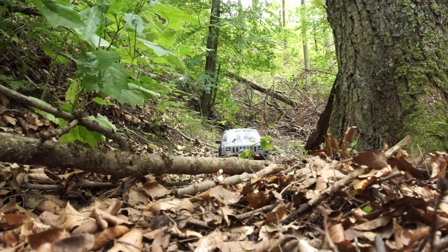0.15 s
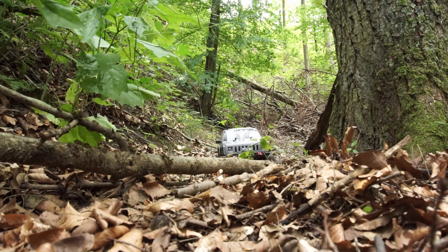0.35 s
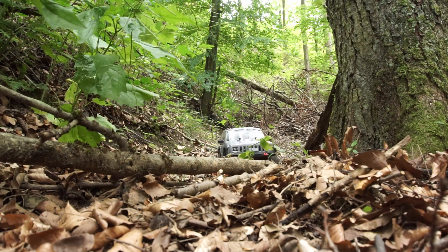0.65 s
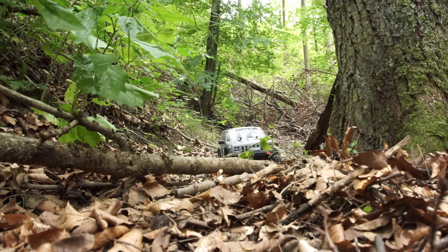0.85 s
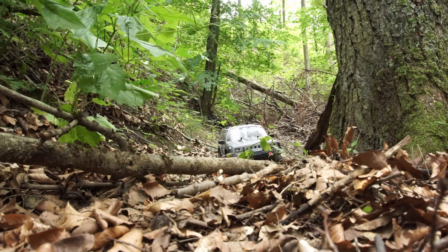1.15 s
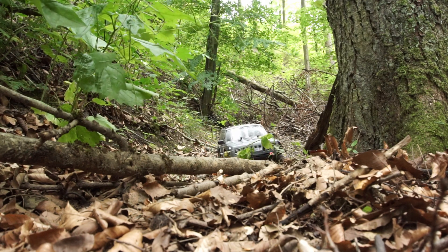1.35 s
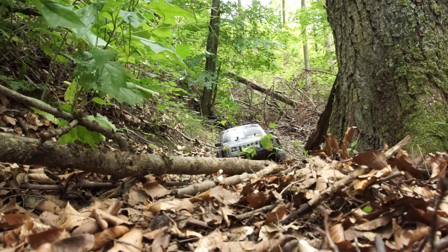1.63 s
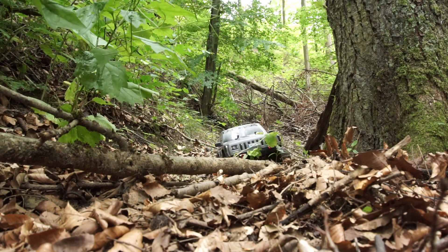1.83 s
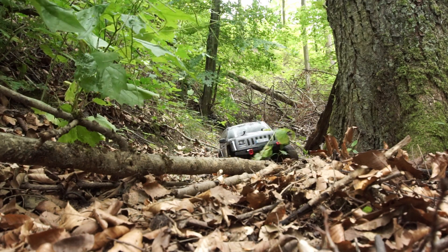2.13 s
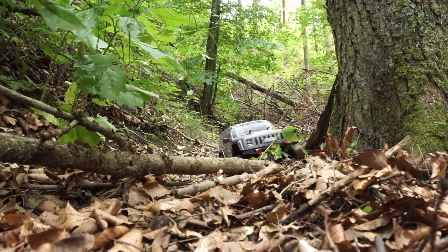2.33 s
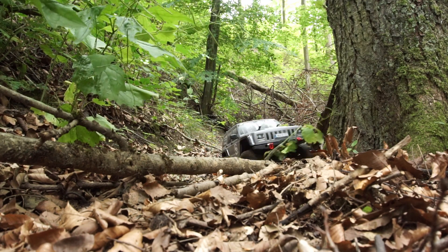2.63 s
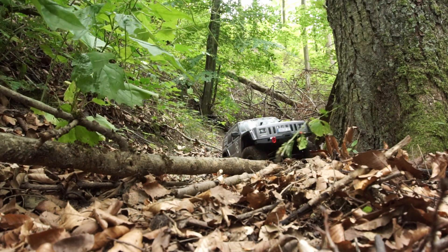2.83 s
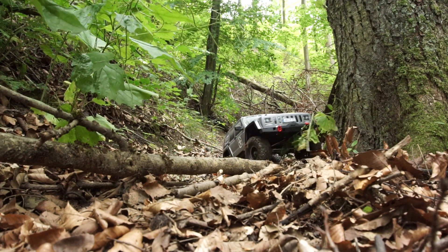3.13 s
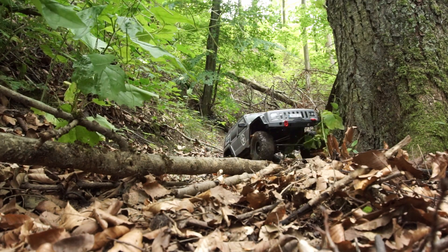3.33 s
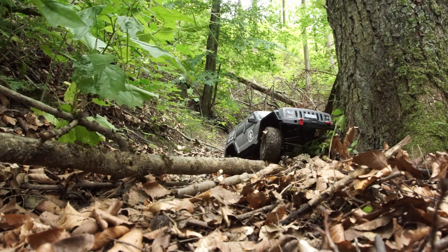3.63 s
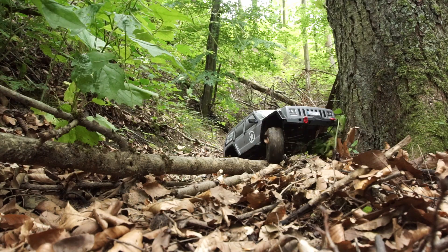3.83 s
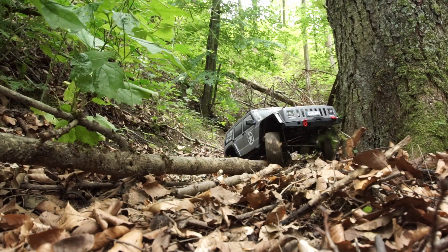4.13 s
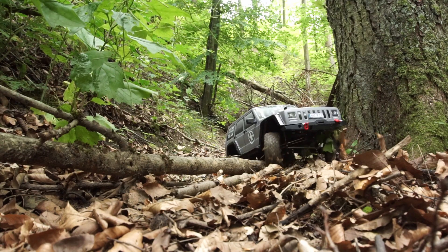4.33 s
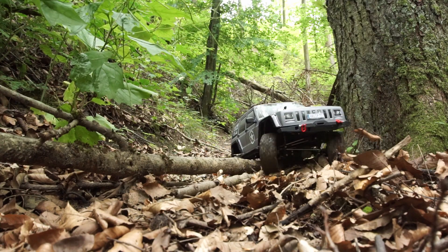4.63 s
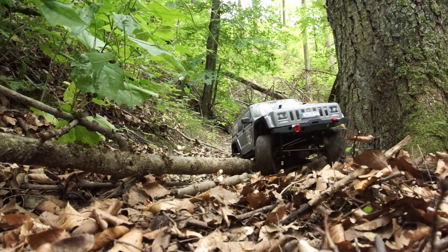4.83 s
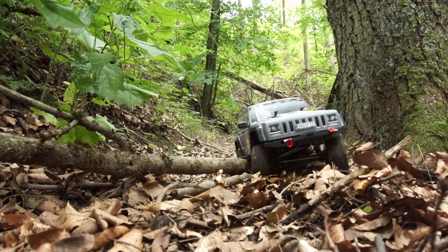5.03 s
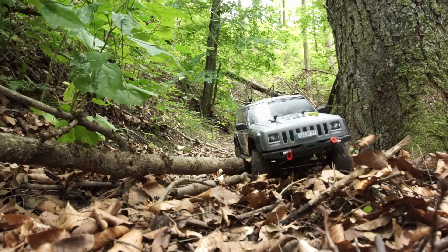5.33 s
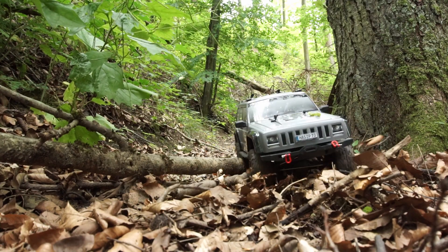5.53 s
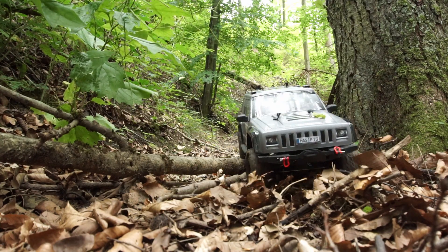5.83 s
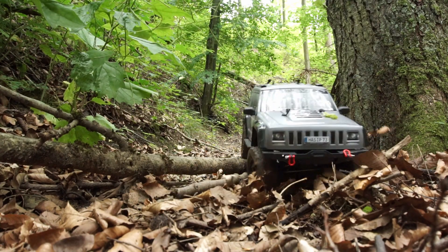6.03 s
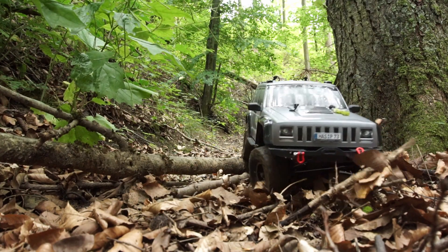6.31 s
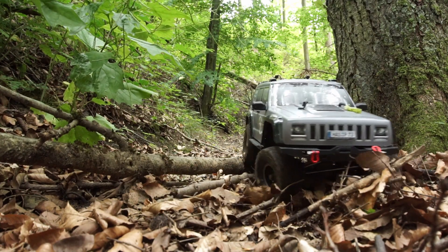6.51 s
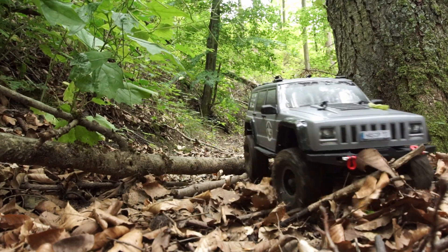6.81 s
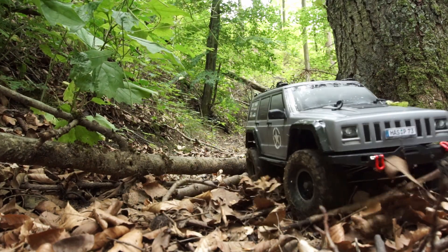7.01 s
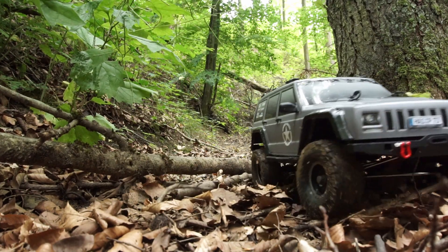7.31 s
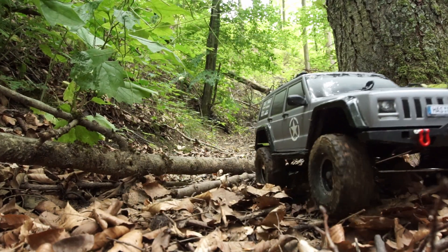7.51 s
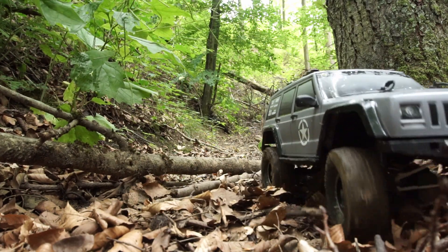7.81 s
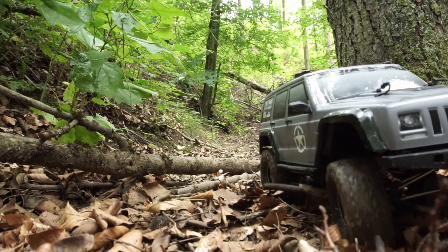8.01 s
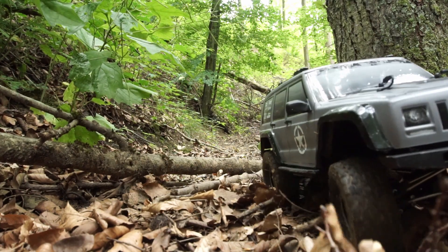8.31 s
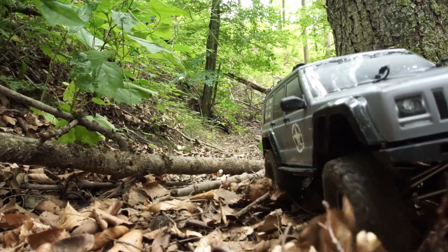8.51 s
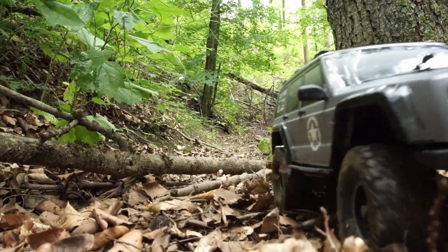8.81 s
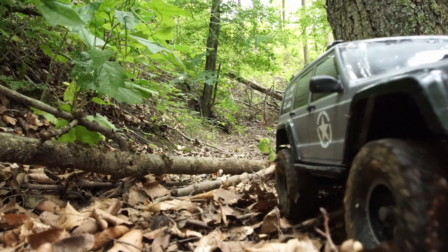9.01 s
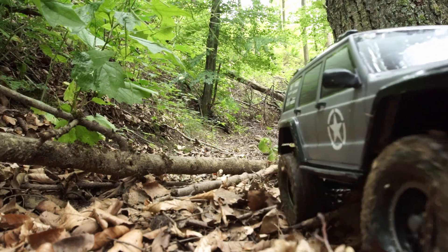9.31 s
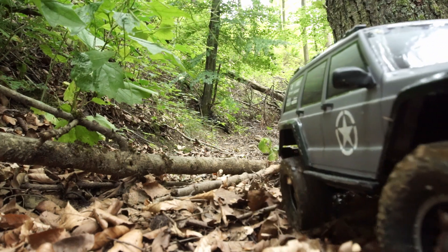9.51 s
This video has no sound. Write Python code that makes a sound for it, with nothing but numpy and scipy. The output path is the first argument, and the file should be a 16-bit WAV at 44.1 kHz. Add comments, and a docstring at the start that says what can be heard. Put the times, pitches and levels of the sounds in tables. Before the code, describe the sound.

Close stereo view from the leaf litter: sparse crackles and short high bird notes come first, over a low pulsating far-off engine. The toy truck bumps over roots with hollow knocks, then from about four seconds its tyres crunch bright, crisp leaves in uneven surges. Gear whirr and motor growl come and go underneath, with hard twig snaps and clacking sticks towards the end.

```python
"""A deep, throbbing drone of far machinery, slowly sinking in pitch, over a wavering forest background.
Close to the microphone a small radio-controlled crawler creeps through dry leaves, from left to right.
Tyres crush leaves in short noise bursts and snap twigs in sharp ones; root knocks ring dully and low.
Motor, gears and plastic shell are rough, juddering resonances; the drone is a sum of sines.
A far bird whistles in short wavering tones, blurred by echo from the trees."""
import sys
import numpy as np
from scipy import signal
from scipy.fft import rfft, irfft
from scipy.io import wavfile
from scipy.ndimage import uniform_filter1d

SR = 44100
rng = np.random.default_rng(int(sys.argv[2]) if len(sys.argv) > 2 else 0)


def waveform_to_disk(signal):
    """Save audio, clipped to [-1, 1], as 16-bit WAV at the path in sys.argv[1]."""
    frames = np.transpose(np.atleast_2d(signal))
    scaled = np.clip(frames, -1, 1) * 32767
    samples = np.round(scaled).astype(np.int16)
    wavfile.write(sys.argv[1], SR, samples)


N = 426006
TIME = np.arange(N) / SR
LEFT_RIGHT = np.array([[-1], [1]])

# the crawler's path past the microphone: t/s, distance/m, left minus right level/dB
PATH = [(0, 2, 2), (3, 0.79, 2.5), (4.2, 1.03, -1.5), (5.7, 0.8, 0), (7, 0.81, -1.5), (7.7, 0.62, -1.5),
        (9.66, 0.8, -2)]


def from_db(db):
    """Decibels to gain."""
    return 10 ** (np.asarray(db) / 20)


def rms_one(x):
    """Scale to unit rms."""
    return x / np.sqrt(np.mean(x ** 2) + 1e-20)


def in_time(rows):
    """One curve per column after the time, joined by straight lines."""
    s, *columns = np.transpose(rows)
    return [np.interp(TIME, s, c) for c in columns]


def at_hz(points, hz):
    """Read a spectrum on a log-frequency axis."""
    f, value = np.transpose(points)
    return np.interp(np.log(hz), np.log(f), value)


def drift(rate):
    """Slow chance with spread 1: noise through two equal poles at rate Hz, drawn every 40 samples."""
    r = np.exp(-80 * np.pi * rate / SR)
    noise = rng.standard_normal(N // 40 + 2002)
    slow = signal.lfilter([1], [1, -2 * r, r * r], noise)[2000:]  # skip the run-in
    return np.interp(np.arange(N) / 40, np.arange(len(slow)), rms_one(slow))


def band(x, low_hz, high_hz, order=2):
    """Causal band-pass."""
    edges = [low_hz, min(high_hz, .45 * SR)]
    return signal.sosfilt(signal.butter(order, edges, "band", fs=SR, output="sos"), x)


def add(out, s, sound):
    """Mix a sound in at time s."""
    start = max(round(s * SR), 0)
    out[..., start:start + sound.shape[-1]] += sound[..., :max(N - start, 0)]


def turning(hz):
    """Phase of something that turns hz times a second."""
    return 2 * np.pi * np.cumsum(hz) / SR


def engine(hum_db=-0.8, throb_db=0.0, waver_db=1.55, wander=0.21):
    """A steady deep note, and an engine's orders that beat at the cycle rate; the air makes them waver."""
    # the deep note: t/s, f/Hz
    hum_pitch = [(0, 72.7), (1.5, 71.05), (2.2, 72.2), (4.2, 70.1), (5.8, 70), (7.4, 68.8)]
    # before hum_db and throb_db: t/s, deep note level/dB, throb level/dB
    engine_level = [(0, -29.5, -30.5), (0.4, -28, -32), (0.9, -28, -27.5), (3.35, -29, -27),
                    (4.35, -30, -34), (4.75, -31.5, -40.5), (5.05, -29.5, -35), (6.9, -30, -29.5),
                    (7.28, -34, -37), (7.5, -29.5, -39), (8.0, -33.5, -56), (8.65, -37.5, -42),
                    (8.9, -42, -71)]
    # the image widens and shifts: t/s, right ear's lead in the deep note/rad, in the throb/rad
    engine_lead = [(1.38, .05, 0.32), (1.6, 2.1, 0.49), (1.9, 1.9, 2.16), (3.25, 2.2, 0.97),
                   (3.42, 0.87, 0.77), (4.4, 0.95, 1.3), (4.75, 1.1, 2.8), (5.02, 0.87, 1.3)]
    # the throbbing engine's speed: t/s, working cycles/Hz
    engine_speed = [(0, 15.0), (0.5, 14.36), (2.6, 14.3), (4.4, 14.06), (5.2, 14.31), (6.4, 14.1)]
    # parts of the throb: multiple of the cycle rate, relative level/dB
    engine_orders = [(7, -36.5), (8, -34), (9, -16), (10, -2.5), (11, -1), (13, -17.5), (14, -17.5)]
    deep_db, beat_db = in_time(engine_level)
    hum_lead, throb_lead = in_time(engine_lead)
    ears = LEFT_RIGHT / 2
    cycle = turning(in_time(engine_speed)[0])
    hum_phase = turning(in_time(hum_pitch)[0])
    hum = from_db(deep_db + hum_db) * np.sin(hum_phase + hum_lead * ears)
    sway = wander * drift(24)  # radians, shared by all orders
    throb = 0
    for multiple, db in engine_orders:
        phase = round(multiple) * cycle + rng.uniform(0, 2 * np.pi) + sway
        throb = throb + from_db(db + waver_db * drift(5.4)) * np.sin(phase + throb_lead * ears)
    return np.sqrt(2) * (hum + from_db(beat_db + throb_db) * throb)


def coloured(spectrum, envelope):
    """Stereo noise in bands of about half an octave, each under a fresh draw of envelope(); rms 1."""
    # how alike the two ears are: f/Hz, left-right correlation
    likeness = [(50, 0.89), (130, 0.99), (290, 0.95), (640, 0.015)]
    out, edges = 0, np.geomspace(22, 17500, 23)
    white = rng.standard_normal((2, 2, N))
    for k, (low, high) in enumerate(zip(edges, edges[1:])):
        hz = np.sqrt(low * high)
        if spectrum[0][0] <= hz <= spectrum[-1][0]:
            mid, side = band(white[k % 2], low, high)
            alike = np.clip(at_hz(likeness, hz), -1, 1)
            pair = np.sqrt(1 + alike) * mid - np.sqrt(1 - alike) * side * LEFT_RIGHT
            out = out + from_db(at_hz(spectrum, hz)) * envelope() * pair
    return rms_one(out)


def forest_air():
    """The forest's background: noise, mostly low, whose bands waver independently."""
    # the background sinks unevenly: t/s, level/dB
    forest_level = [(0, -37), (3, -35.5), (4.5, -41.5), (7.2, -38), (9, -43.5)]
    # its colour: f/Hz, relative level/dB per Hz
    forest_spectrum = [(25, -55), (48, 3.5), (90, 3), (160, 1.5), (250, -31), (450, -10.5), (900, -12),
                       (3000, -13.5), (6000, -16.5), (15000, -19.5)]
    noise = coloured(forest_spectrum, lambda: from_db(1.8 * drift(14)))
    return from_db(in_time(forest_level)[0]) * noise


def ripple(count, size, width):
    """Rows of random curves with spread 1, straight between knots width points apart."""
    knots = rng.standard_normal((count, size + 2))
    position = np.arange(size) / max(width, 1)
    i, part = position.astype(int), position % 1
    return rms_one(knots[:, i] * (1 - part) + knots[:, i + 1] * part)


def crumpling(spectrum, per_s, size_db, decay_s, rise_s, uneven_hz, uneven_db, flutter_db, size=1280):
    """Leaf after leaf buckles in a short stuttering burst, each of a different random colour."""
    count = int(per_s * N / SR)
    hz, t = np.arange(1, size // 2 + 2) * SR / size, TIME[:size]
    fine_db = uneven_db * np.tanh(ripple(count, len(hz), uneven_hz / hz[0]))
    broad_db = 2 * ripple(count, len(hz), 2500 / hz[0])
    colour_db = at_hz(spectrum, hz) + fine_db + broad_db
    noise = irfft(rfft(rng.standard_normal((2, count, size))) * from_db(colour_db))
    stutter = from_db(flutter_db * ripple(count, size, 29.0))
    strength = from_db(size_db * np.minimum(rng.exponential(1, (count, 1)), 4))
    shape = (1 - np.exp(-t / rise_s)) * np.exp(-t / decay_s) * (1 - t / t[-1])
    bursts = noise * stutter * strength * shape
    out = np.zeros((2, N))
    times = (np.arange(count) + 2 * rng.random(count)) / per_s
    for k, s in enumerate(times):
        add(out, s, bursts[:, k])
    power = np.mean(out ** 2, axis=0)
    # even out the chance clumping of the bursts
    return out / np.sqrt(uniform_filter1d(power, SR // 12) + 0.17 * power.mean())


def bite(hold_s, rise_s=0.008, fall_s=0.014):
    """Attack, hold and dying release of a tyre pressing into leaves."""
    t = TIME[:SR // 2]
    return np.minimum(t / rise_s, 1) * np.exp(-np.maximum(t - hold_s, 0) / fall_s)


def leaves(crackle_db=-1.52, crunch_right_db=3.0, surge_db=1.0):
    """Thin leaf edges crackle brightly; whole leaves crunch lower; both surge as the tread bites."""
    # steady crackle of tyres rolling on the litter, before crackle_db: t/s, level/dB
    rolling = [(0, -37), (1.1, -43), (1.4, -39), (2.6, -38), (3.25, -42), (4.1, -27), (4.8, -30),
               (5.1, -26.5), (5.7, -32.5), (6.55, -25.5), (7.0, -25.5), (7.55, -29), (7.85, -24),
               (8.75, -26), (9.05, -30.5), (9.66, -27)]
    # a tyre bites into a heap of leaves: t/s, hold/s, crackle level/dB, crunch level/dB
    bites = [(1.48, 0.23, -39.5, -43), (2.16, 0.02, -51, -32), (2.323, 0.074, -36, -39),
             (3.34, 0.068, -51, -30), (3.409, 0.057, -54, -39), (3.493, 0.193, -35, -42),
             (3.886, 0.15, -27.5, -31.5), (4.108, 0.064, -32, -35.5), (4.542, 0.12, -30, -30.5),
             (4.913, .16, -28, -30.5), (6.357, 0.046, -25.5, -43), (6.96, 0.1, -25.5, -49),
             (7.197, 0.019, -25, -32), (7.755, 0.14, -26.5, -27.5), (7.901, 0.056, -27, -38),
             (8.133, 0.121, -25, -37.5), (8.62, 0.063, -28, -33.5), (8.763, 0.053, -28, -29.5),
             (8.871, 0.066, -33, -35), (9.098, 0.025, -26, -37), (9.22, 0.036, -30, -37),
             (9.48, 0.16, -27.5, -31.5)]
    # colour of the leaf edges: f/Hz, relative level/dB
    edge_spectrum = [(1500, -22), (3500, -6.5), (7000, -2.5), (10000, 1), (12500, 3), (15000, 2),
                     (16200, -13)]
    # colour of the whole leaves: f/Hz, relative level/dB
    leaf_spectrum = [(200, -10), (380, -6.5), (600, -1), (1000, -9.5), (1500, -8), (1900, -8.5), (3000, -2),
                     (4500, -1.5), (6500, -6), (10000, -9)]
    rolling_db, = in_time(rolling)
    # the crunch sits at -37.5 dB when the crackle is at its mean, and takes 0.79 of its swing
    rolling_crunch_db = -37.5 + 0.79 * (rolling_db - rolling_db.mean())
    power = from_db([rolling_db + crackle_db, rolling_crunch_db]) ** 2
    for s, hold_s, edge_db, leaf_db in bites:
        add(power, s, (from_db([[edge_db], [leaf_db]]) * bite(hold_s)) ** 2)
    edges, whole = np.sqrt(power) * from_db(surge_db * drift(13))
    crackle = crumpling(edge_spectrum, per_s=125, size_db=2.0, decay_s=0.12, rise_s=0.0066,
                        uneven_hz=110, uneven_db=8.0, flutter_db=0.5)
    crunch = crumpling(leaf_spectrum, per_s=105, size_db=1.5, decay_s=0.087, rise_s=0.0099,
                       uneven_hz=115.26, uneven_db=10.5, flutter_db=1.0)
    return edges * crackle + whole * from_db(crunch_right_db * LEFT_RIGHT) * crunch


def rough_tone(centre_hz, width_hz, unsteady, judder_db, waver_per_s=12):
    """A resonance shaken by uneven contacts: pitch wavers, strength judders about an even level."""
    alike, lead = 0.55, 1.53  # share both ears hear alike, right ear's lead in radians
    smooth = signal.butter(2, width_hz / 2, fs=SR, output="sos")
    shaking = signal.sosfilt(smooth, rng.standard_normal((2, 3, N)))
    common, separate = shaking[:, :1], shaking[:, 1:]
    real, imaginary = np.sqrt(alike) * common + np.sqrt(1 - alike) * separate
    wavering_hz = centre_hz * (1 + unsteady * drift(waver_per_s))
    phase = turning(wavering_hz) + lead * LEFT_RIGHT / 2
    tone = (real * np.cos(phase) + imaginary * np.sin(phase)) * from_db(judder_db * drift(10.7))
    return tone / np.sqrt(uniform_filter1d(np.mean(tone ** 2, axis=0), SR // 6))


def drivetrain(growl_db=0.0, whirr_right_db=0.2):
    """The hollow shell booms, the motor growls and the gear teeth whirr above it."""
    # load on the motor, as the level of its growl: t/s, level/dB
    load = [(0, -43), (1.2, -47), (1.55, -37), (1.85, -42.5), (2.4, -35.5), (3.2, -48.5), (3.68, -40),
            (4.6, -39), (5.05, -41), (5.3, -43), (6.1, -46), (6.6, -38), (6.85, -38.5), (7.3, -52),
            (7.52, -41), (8.25, -46), (8.6, -34.5), (8.98, -64.5), (9.4, -34.5), (9.66, -57)]
    # t/s, growl centre f/Hz, whirr centre f/Hz
    drive_pitch = [(0, 425, 779.5), (1.8, 410, 804.7), (2.5, 409.4, 928.7), (3.1, 430, 900.6),
                   (3.7, 370, 699), (4.5, 455, 768.7), (5.6, 375, 750), (6.8, 445, 783.4),
                   (7.5, 345, 721.5), (9.1, 346.5, 808), (9.42, 569, 783)]
    # the shell swells as the chassis twists over the ground: middle t/s, length/s, level/dB
    booms = [(.4, 0.33, -40), (2.552, 2.2, -37.5), (3.413, 0.32, -33), (5.052, .3, -45),
             (6.548, 1.88, -33.5), (7.474, 0.31, -37.5)]
    load_db, = in_time(load)
    distance_m, _ = in_time(PATH)
    # the whirr: -48.5 dB at 1 m and mean load, 0.51 of the load's swing, 7.5 dB per halved distance
    gears_db = -48.5 + 0.51 * (load_db - load_db.mean()) - 7.5 * np.log2(distance_m)
    shell_power = np.full(N, from_db(-46) ** 2)  # at rest
    for s, length, db in booms:
        swell = from_db(db) * np.hanning(int(length * SR))
        add(shell_power, s - length / 2, swell ** 2)
    growl_hz, whirr_hz = in_time(drive_pitch)
    boom = rough_tone(np.ones(N) * 266, width_hz=59, unsteady=0.02486, judder_db=2.5)
    growl = rough_tone(growl_hz, width_hz=64, unsteady=0.093, judder_db=3.0)
    chatter = 0.045 * (whirr_hz / whirr_hz.mean()) ** 6  # the teeth run rougher at speed
    whirr = rough_tone(whirr_hz, width_hz=56, unsteady=chatter, judder_db=7.0, waver_per_s=39.6)
    whirr = whirr * from_db(whirr_right_db * LEFT_RIGHT)
    return np.sqrt(shell_power) * boom + from_db(load_db + growl_db) * growl + from_db(gears_db) * whirr


def among_trees(x, t60, wet_db):
    """Trunks and ground scatter a short diffuse tail, different at each ear."""
    t = TIME[:SR]
    tail = rng.standard_normal((2, SR)) * from_db(-60 * t / t60)
    tail /= np.sqrt(np.sum(tail ** 2, axis=1, keepdims=True))
    scattered = signal.fftconvolve(x * np.ones((2, 1)), tail, axes=1)[:, :N]
    return x + from_db(wet_db) * scattered


def bird(level_db=0.0, warble=0.015, broken_db=2.0):
    """Short whistles that waver and break up, blurred by echo from the trees."""
    # whistles before the echo: t/s, length/s, f/Hz, level/dB
    whistles = [(0.263, 0.17, 3670, -51), (.35, 0.14, 3480, -53), (.6, 0.17, 3160, -52.5),
                (0.82, 0.42, 3100, -51), (1.05, 0.13, 4000, -51), (1.56, 0.15, 4250, -50),
                (1.141, 0.36, 2440, -56), (1.268, 0.22, 3660, -51), (1.694, 0.23, 2844, -51),
                (2.05, 0.13, 3640, -47), (2.528, 0.19, 3620, -49), (5.417, 0.17, 3190, -48)]
    out, waver = np.zeros(N), 1 + warble * drift(36)
    for s, length, pitch_hz, db in whistles:
        n = int(length * SR)
        hz = pitch_hz * waver[int(s * SR):][:n]
        add(out, s, from_db(db + level_db) * signal.windows.tukey(n, .5) * np.sin(turning(hz)))
    return among_trees(out * from_db(broken_db * drift(24)), t60=0.81, wet_db=6.5)


def burst(hz, t60, width, attack_s, order=1):
    """A stereo burst of broken-up ringing around one pitch, peak near 1."""
    t = TIME[:min(int((t60 + 2 * attack_s) * SR), SR // 4)]
    shape = (1 - np.exp(-t / attack_s)) * from_db(-60 * t / t60) / 2
    white = rng.standard_normal((2, SR // 4))
    noise = band(white, hz / (1 + width), hz * (1 + width), order=order)[:, -len(t):]
    return rms_one(noise * shape) * np.sqrt(np.mean(shape ** 2))


def twigs(level_db=6.0):
    """Twigs break in a sharp, wide burst, brittle leaves higher; clacking sticks ring more narrowly."""
    # all three tables give the peak before level_db
    # twigs breaking: t/s, peak level/dB, centre f/Hz, ring time/s
    snaps = [(1.668, -18.5, 3780, 0.051), (2.212, -19.5, 4300, 0.036), (2.216, -23.5, 1920, 0.057),
             (3.329, -25, 2380, 0.14), (3.362, -28, 2920, 0.088), (3.388, -30, 4250, 0.071),
             (3.66, -14.5, 4700, 0.03), (3.908, -22, 3950, 0.081), (3.993, -19, 3100, 0.034),
             (4.118, -21.5, 3970, 0.1), (4.246, -24, 3960, 0.072), (5.968, -16.5, 6070, 0.029),
             (6.370, -19.5, 5900, 0.053), (6.865, -16.5, 8660, 0.062), (7.092, -20, 4430, 0.031),
             (7.208, -20, 2610, 0.023), (7.824, -10.5, 4100, 0.022), (8.79, -21.5, 2480, 0.12),
             (9.342, -15.5, 4600, 0.045)]
    # brittle leaves cracking brightly: t/s, peak level/dB
    cracks = [(0.301, -24), (.931, -19), (1.665, -13), (1.675, -17), (1.767, -20.5), (3.385, -14),
              (3.661, -19), (4.377, -16), (4.463, -28), (4.799, -22), (5.012, -17), (6.246, -22),
              (6.613, -23), (7.104, -16.5), (7.204, -17), (7.283, -17), (7.328, -20), (8.051, -15),
              (8.299, -16), (8.94, -19), (8.993, -23), (9.158, -19), (9.19, -20.5)]
    # sticks clacking against the chassis: t/s, peak level/dB, centre f/Hz, ring time/s
    clacks = [(7.947, -13.5, 4436, 0.078), (9.409, -9.5, 3220, 0.05), (9.639, -17, 2700, 0.075)]
    out = np.zeros((2, N))
    for s, db, hz, t60 in snaps:
        add(out, s, from_db(db + level_db) * burst(hz, t60, width=0.37, attack_s=0.0015, order=2))
    for s, db in cracks:
        crack = burst(10300, t60=0.038, width=0.48, attack_s=0.0012, order=2)
        add(out, s, from_db(db + level_db) * crack)
    for s, db, hz, t60 in clacks:
        add(out, s, from_db(db + level_db) * burst(hz, t60, width=0.15, attack_s=0.0047, order=2))
    return out


def body(level_db=8.5):
    """Dull knocks of the chassis and its plastic shell."""
    # the body knocking over roots, before level_db: t/s, peak level/dB, centre f/Hz
    knocks = [(2.18, -15.5, 392), (2.215, -23, 585), (3.033, -15.5, 467), (3.328, -19, 458),
              (3.358, -13, 397), (3.362, -16.5, 693), (3.412, -16, 425), (3.443, -22, 456),
              (4.155, -16, 372), (4.156, -23, 706), (5.06, -21.5, 704), (5.091, -16, 316), (6.6, -21, 500),
              (6.715, -19.5, 574), (7.195, -22, 715), (7.79, -21, 830), (9.051, -23.5, 320)]
    out = np.zeros((2, N))
    for s, db, hz in knocks:
        knock = burst(hz, t60=0.115, width=0.16, attack_s=0.022, order=2)
        add(out, s, from_db(db + level_db) * knock)
    return out


def scene():
    """Leaves and twigs shift to the right with the crawler, in front of the forest's background."""
    _, left_db = in_time(PATH)
    ground = (leaves() + twigs()) * from_db(-left_db * LEFT_RIGHT / 2)
    return ground + drivetrain() + body() + engine() + bird() + forest_air()


def record(dry):
    """The treble is cut steeply above 16 kHz."""
    return signal.sosfilt(signal.ellip(10, .2, 80, 16000, fs=SR, output="sos"), dry)


dry = scene()
out = record(dry)
waveform_to_disk(out)
```